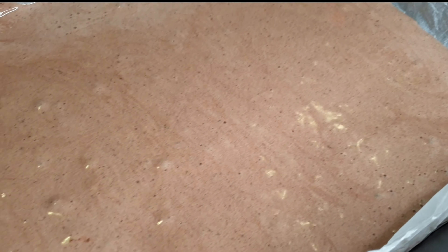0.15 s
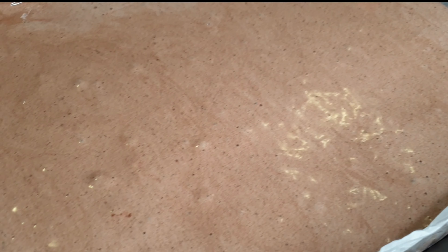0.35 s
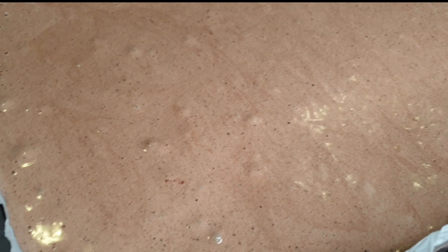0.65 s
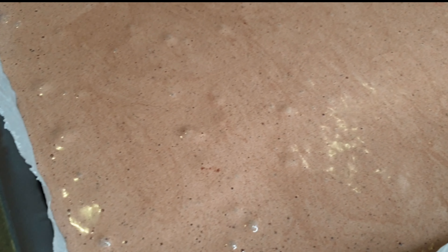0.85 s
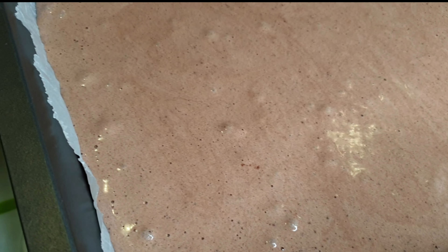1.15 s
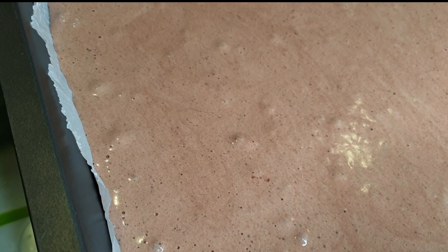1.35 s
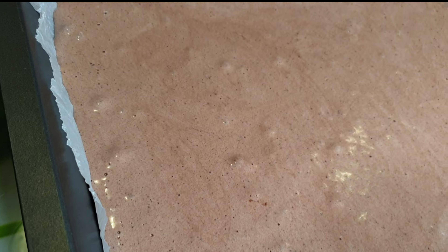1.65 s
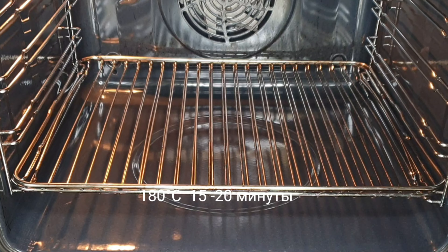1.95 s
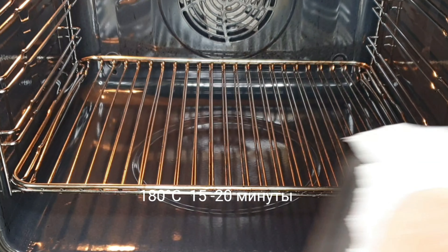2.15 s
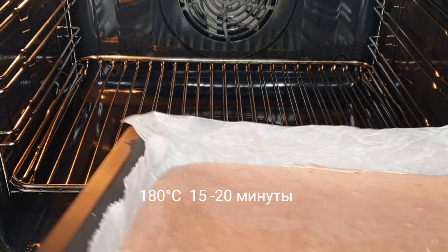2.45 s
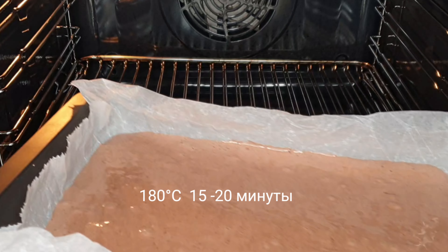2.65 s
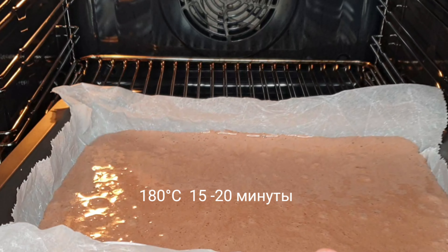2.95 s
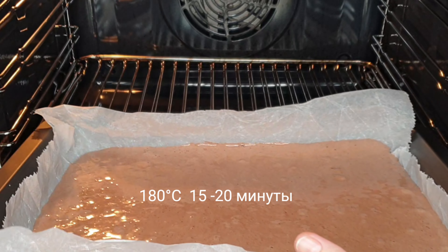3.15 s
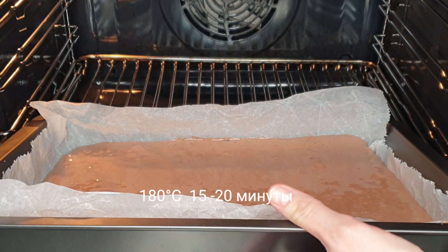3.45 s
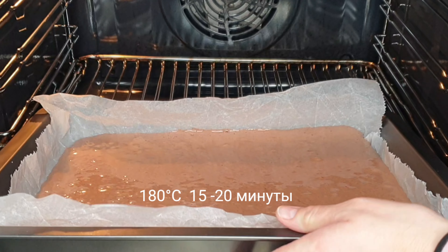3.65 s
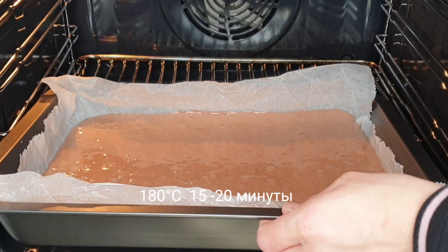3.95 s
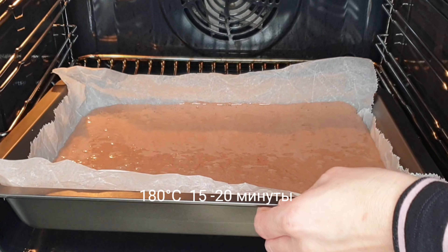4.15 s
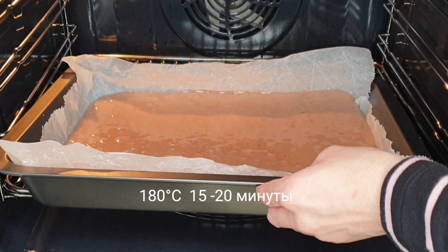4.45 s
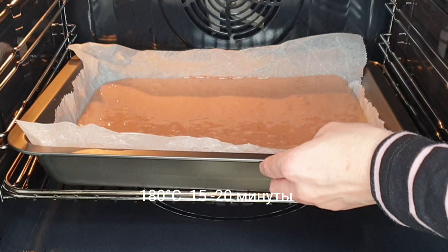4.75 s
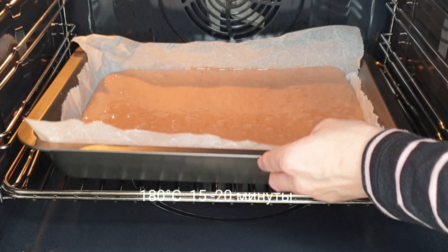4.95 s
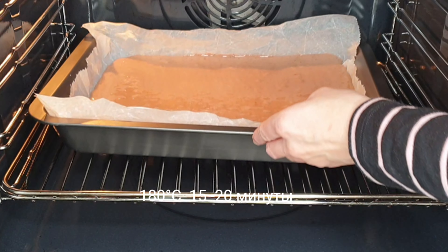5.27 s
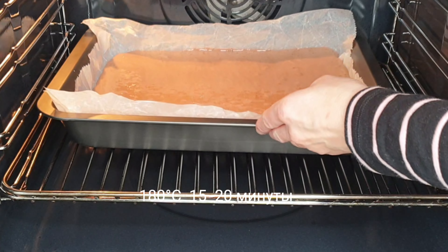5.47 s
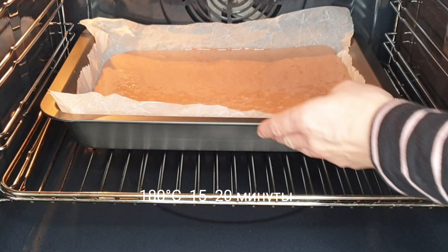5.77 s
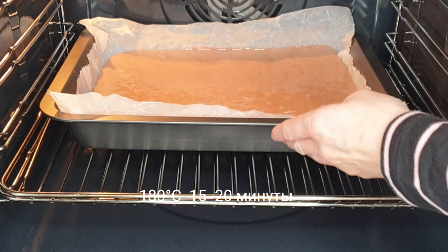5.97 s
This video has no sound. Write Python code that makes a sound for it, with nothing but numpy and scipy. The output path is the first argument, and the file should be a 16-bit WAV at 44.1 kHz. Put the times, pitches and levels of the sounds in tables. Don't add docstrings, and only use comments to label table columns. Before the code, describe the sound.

Quiet room tone, then soft oven hum, a crisp paper brush, one loud metallic clank, lighter knocks and uneven scraping as a tray slides in.

```python
import sys
import numpy as np
from scipy import signal
from scipy.fft import rfft, irfft
from scipy.io import wavfile
from scipy.ndimage import uniform_filter1d

SR = 44100
rng = np.random.default_rng(int(sys.argv[2]) if len(sys.argv) > 2 else 0)


def bounce(signal):
    frames = np.transpose(np.atleast_2d(signal))
    limited = np.clip(frames, -1, 1)
    pcm = np.round(limited * 32767).astype(np.int16)
    wavfile.write(sys.argv[1], SR, pcm)


def convert_level_to_amplitude(level_db):
    exponent = np.asarray(level_db, float) / 20
    return 10 ** exponent


N = 269451


def evened(x):
    return x / np.sqrt(np.mean(x ** 2) + 1e-24)


def read(points, hz):
    point_hz, value = np.transpose(points)
    return np.interp(np.log(hz + 1), np.log(point_hz + 1), value)


def columns(rows):
    start_s, *rest = np.transpose(rows)
    t = np.arange(N) / SR
    gate = np.clip(np.minimum(t - start_s[0], start_s[-1] - t) / 0.0024, 0, 1)
    return gate, *(np.interp(t, start_s, column) for column in rest)


# pitch_hz [Hz], left_over_right_db [dB]
MIC_LEAN = [(60, -1), (130, -1.5), (290, -2.0), (640, -3.0), (1410, -5), (3100, -5), (6820, -5.5),
            (15000, 1.5)]


def pair(tone, same, size, grit=1., lean=MIC_LEAN):
    hz = np.fft.rfftfreq(size, 1 / SR)
    a, b = rfft(rng.standard_normal((2, size)) * grit)
    likeness = np.clip(read(same, hz), -1, 1)
    half_db = read(lean, hz) / 2
    left = a * convert_level_to_amplitude(half_db)
    right = (likeness * a + np.sqrt(1 - likeness ** 2) * b) * convert_level_to_amplitude(-half_db)
    return irfft(np.array([left, right]) * convert_level_to_amplitude(read(tone, hz)), size)


def split(x, edges_hz, order=2):
    size = x.shape[-1]
    hz, z = np.fft.rfftfreq(size, 1 / SR), rfft(x)
    below = [0 * hz] + [1 / (1 + (hz / edge) ** (2 * order)) for edge in edges_hz] + [0 * hz + 1]
    return [irfft(z * (upper - lower), size) for lower, upper in zip(below, below[1:])]


def resonate(x, hz, width_hz):
    radius = np.exp(-np.pi * width_hz / SR)
    pole = radius * np.exp(2j * np.pi * hz / SR)
    out = 2 * signal.lfilter([1 - radius], [1, -pole], x)
    return out if np.iscomplexobj(x) else out.real


def slow(rate_hz):
    points = int(N * rate_hz // SR + 2)
    chance = rng.standard_normal(points)
    return evened(np.interp(np.arange(N) * rate_hz / SR, np.arange(points), chance))


def tones(lines, waver_db, waver_hz, apart_rad):
    out = np.zeros((len(lines), 2, N))
    for k, (hz, db) in enumerate(lines):
        phase = 2 * np.pi * (np.cumsum(hz + waver_hz * slow(9)) / SR + rng.random())
        level = np.sqrt(2) * convert_level_to_amplitude(db + waver_db * slow(11))
        out[k] = level * np.sin(phase - np.array([[0], [apart_rad]]))
    return out


# start_s [s], rumble_db [dB], hiss_db [dB], lower_whine_db [dB], upper_whine_db [dB]
KITCHEN_LEVELS = [(0.0, -65.5, -78.5, -88, -79.5), (0.326, -68, -78, -78, -78.5),
                  (0.35, -70.5, -77, -78, -82), (0.642, -62, -80, -77, -88), (0.756, -64.5, -79, -89, -96),
                  (0.84, -64, -73.5, -72.5, -87), (0.908, -64, -74.5, -86, -88),
                  (0.942, -69, -77.5, -78, -96), (0.992, -64.5, -79, -89, -96),
                  (1.126, -65, -79.5, -86.5, -99), (1.23, -69.5, -78.5, -86, -97),
                  (1.328, -64, -80.5, -91, -98), (1.59, -68, -78.5, -83, -99), (1.64, -64, -78, -83, -96),
                  (1.734, -68.5, -85, -85, -101), (1.775, -80, -108, -94, -119)]
# pitch_hz [Hz], level_db [dB per Hz]
KITCHEN_AIR = [(18, -19), (30, -20), (55, -9.5), (97, -6.5), (130, -5), (256, -11.5), (369, -12),
               (970, -36.5), (1910, -36), (2240, -31), (3070, -40), (8060, -47), (15500, -36)]
# pitch_hz [Hz], width_hz [Hz], level_db [dB]
ROOM_MODES = [(62.3, 15, -3.5), (128.6, 11, 1), (228, 15, -11.5), (286, 16, -8.5), (373, 10, -10.5),
              (478, 35, -17)]
# pitch_hz [Hz], level_db [dB]
KITCHEN_WHINE = [(2218, -82), (2266, -76.5), (2412, -85), (2460, -95.5)]
# pitch_hz [Hz], left_right_likeness [-1 to 1]
KITCHEN_SAME = [(60, 0.64), (180, 0.74), (550, 0.39), (1650, -0.23), (4970, 0.17), (15000, -0.01)]


def kitchen():
    gate, rumble_db, hiss_db, lower_db, upper_db = columns(KITCHEN_LEVELS)
    air = pair(KITCHEN_AIR, KITCHEN_SAME, N, lean=[(60, -5), (9000, 1.5)])
    low, mid, high = split(air, [900, 3000])
    white = pair([(30, 0), (9000, 0)], KITCHEN_SAME, N)
    standing = sum(convert_level_to_amplitude(db + 4.1 * slow(8.1)) * evened(resonate(white, hz, width_hz))
                   for hz, width_hz, db in ROOM_MODES)
    rumble = evened(evened(low) + 0.64 * evened(standing))
    lines = tones(KITCHEN_WHINE, waver_db=1.2, waver_hz=0.6, apart_rad=1.2)
    whine = evened(lines[:2].sum(0)) * convert_level_to_amplitude(lower_db) + evened(lines[2:].sum(0)) * convert_level_to_amplitude(upper_db)
    hiss = evened(high) * convert_level_to_amplitude(hiss_db) + evened(mid) * convert_level_to_amplitude(hiss_db - 4)
    return gate * (rumble * convert_level_to_amplitude(rumble_db) + hiss + whine)


# pitch_hz [Hz], level_db [dB per Hz]
OVEN_AIR = [(18, -41), (30, -14.5), (114, -5), (455, -19.5), (518, -19), (639, -26.5), (830, -24.5),
            (970, -46.5), (1140, -35), (1770, -46), (2490, -44.5), (4420, -50.5), (15500, -47.5)]
# pitch_hz [Hz], level_db [dB]
OVEN_HUM = [(100.5, -72.5), (200.5, -79.5)]
# pitch_hz [Hz], left_right_likeness [-1 to 1]
OVEN_SAME = [(60, 0.94), (180, 0.96), (550, 0.63), (1650, 0.13), (4970, -0.05), (15000, 0.01)]


def oven(whine_db, air_db):
    air = evened(pair(OVEN_AIR, OVEN_SAME, N))
    upper_whine = resonate(air, 2420, 30)
    lower_whine = resonate(resonate(air, 2260, 90), 2260, 90)
    whine = evened(lower_whine + 0.616 * upper_whine)
    fan = convert_level_to_amplitude(-64 - 6 + air_db + 1.7 * slow(4.1)) * air
    hum = tones(OVEN_HUM, waver_db=2.5, waver_hz=2.5, apart_rad=0.1).sum(0)
    return fan + convert_level_to_amplitude(whine_db) * whine + hum


def ringing(modes, t, ring, build_cycles):
    hz, db, t60 = np.transpose(modes)[:, :, None, None]
    luck = rng.random((len(modes), 3, 1))
    phase = 2 * np.pi * (luck[:, :1] + np.clip(hz / 1800, 0, 1) * luck[:, 1:])
    envelope = convert_level_to_amplitude(db - 60 * t / (ring * t60)) * (1 - np.exp(-t * hz / build_cycles))
    return evened((envelope * np.sin(2 * np.pi * hz * t + phase)).sum(0))


def peaked(x):
    return x / abs(x.mean(0)).max()


# pitch_hz [Hz], level_db [dB per Hz]
CLANG = [(29, -47.5), (50, -19), (89, 0), (283, -0.5), (387, -2.5), (481, -15), (543, -3.5), (798, -12),
         (1060, -9.5), (1260, -12.5), (1900, -15), (10000, -30), (15800, -37)]
# pitch_hz [Hz], left_right_likeness [-1 to 1]
BLOW_SAME = [(60, 0.97), (130, 0.98), (290, 0.72), (640, 0.69), (1410, 0.1), (3100, -0.02), (6820, -0.0),
             (15000, 0.02)]
# pitch_hz [Hz], t60_s [s]
TAIL = [(60, 0.53), (170, 0.54), (480, 0.44), (1400, 0.45), (2700, 0.49), (5400, .26), (11000, 0.3)]
# pitch_hz [Hz], level_db [dB], t60_s [s]
RACK_MODES = [(350, 1, 0.81), (516, -12, 1.74), (717, -2, 0.97), (1090, -10.5, 0.78), (1903, -16, 0.49),
              (2430, -35, 4.6)]


def knock(modes, thud_db, tick_db, lean_db, ring):
    t = np.arange(24576) / SR
    edges = np.geomspace(110, 9000, num=8)
    mids = np.r_[70, np.sqrt(edges[1:] * edges[:-1]), 12000]
    clang = pair(CLANG, BLOW_SAME, len(t), lean=[(60, 0.0014), (9000, 0)])
    dense = 0
    for band, hz in zip(split(clang, edges), mids):
        rise = 1 - np.exp(-t / (0.0002 + 1.1 / hz))
        late = convert_level_to_amplitude(-60 * t / (ring * read(TAIL, hz)))
        early = 2.5 * np.exp(-t / 0.0045)
        dense = dense + band * rise * (late + early)
    swing = (1 - t[:200] / 0.00016) * np.exp(-t[:200] / 0.00016)
    echoes = np.zeros((2, len(t)))
    delay = np.c_[[4, 12], rng.integers(20, 200, (2, 5))]
    np.put_along_axis(echoes, delay, rng.choice([-1, 1], 6) * np.exp(-delay / 220), 1)
    crack = signal.fftconvolve(echoes, swing[None], axes=1)[:, :len(t)]
    tray = ringing(modes, t, ring, build_cycles=2.3)
    wires = ringing(RACK_MODES, t, ring, build_cycles=60)
    struck = evened(dense) + 0.7 * tray + 0.03 * wires + 14 * crack
    low, mid, high = split(struck, [500, 4000])
    both = peaked(mid) + convert_level_to_amplitude(thud_db) * peaked(low) + convert_level_to_amplitude(tick_db) * peaked(high)
    side = convert_level_to_amplitude([[lean_db / 2], [-lean_db / 2]])
    return both * side * np.clip(t / 0.0002, 0, 1) * np.clip((t[-1] - t) * 10, 0, 1)


# start_s [s], peak_db [dB], thud_db [dB
# relative], tick_db [dB relative], left_lean_db [dB], ring [share of a full blow]
KNOCKS = [(2.054, -66.5, -15, 3, -6.5, 0.57), (2.444, -57, -27, 4.5, -6, 0.87),
          (2.478, -59.5, 0, 4, -4.5, 0.7), (2.522, -18.5, -14.5, -2.5, -2, 0.83),
          (3.199, -46.5, -12, -11.5, -2.5, 0.5), (3.212, -44, -7, -19.5, -4.5, 0.76),
          (3.349, -47, -18, -1, -5, 0.36), (3.382, -44.5, -5, -15.5, -4, 0.41),
          (3.407, -40.5, -7, -1, -2.5, 0.58), (3.449, -46, -14, -0.5, -8.5, 0.54),
          (3.496, -48.5, -12, 1.5, -5, 0.73), (3.68, -62, -13, -3.5, -5.5, 0.65),
          (3.701, -57, -4, -23.5, -4.0, 0.9), (5.003, -59.5, -15, -3, -3, 0.57),
          (5.533, -37.5, -12.5, -14.5, -5, 0.59), (5.569, -47, -2, -19.5, -1, 0.74),
          (2.505, -50, -17, 7.5, -5, .4),
    (2.543, -27.5, -1, -6, -2, 0.84),
    (3.531, -56.5, -5, -2, -3, 0.68),
]
# pitch_hz [Hz], level_db [dB], t60_s [s]
TRAY_FRONT = [(81.4, -10.5, 0.88), (230.8, -8, 0.47), (359.3, 0.5, 0.34), (394.4, -4.5, 0.33),
              (437.3, -10, 0.6), (537.5, -3.5, 0.32), (628, -4, 0.26), (889, -10.5, 0.21), (1054, -10, 0.3),
              (1090, -16.5, 0.34), (1390, -18, 0.29), (1503, -8.5, 0.17), (1723, -12.5, 0.36),
              (1826, -11, 0.16), (1880, -10, 0.27), (2200, -14.5, 0.37), (2385, -20.5, 0.44),
              (2773, -10.5, 0.17), (2955, -21, 0.31), (3066, -26.5, 0.19), (3330, -30, 0.26),
              (3470, -19.5, 0.15), (3871, -21, 0.29), (4170, -23.5, 0.34), (4240, -28.5, 0.26),
              (4830, -27.5, 0.3)]
# pitch_hz [Hz], level_db [dB], t60_s [s]
TRAY_IN = [(200, -6, 0.44), (421.6, -1, 0.96), (633, -12.5, 0.21), (920, -6, 0.77), (983, -22, 0.89),
           (1060, -4, 0.35), (1217, -24.5, 0.92), (1440, -20, 0.42), (2019, -22, 0.74), (2600, -10.5, 0.35),
           (3630, -40, 0.28), (4140, -27, 0.32), (4700, -28, 0.94), (4860, -44, 0.37)]


def knocks():
    out = np.zeros((2, N + SR))
    for start_s, peak_db, *colour in KNOCKS:
        modes = TRAY_FRONT if start_s < 3.6 else TRAY_IN
        sound = convert_level_to_amplitude(peak_db) * knock(modes, *colour)
        out[:, round(start_s * SR):][:, :sound.shape[1]] += sound
    return out[:, :N]


def grit(per_s, spread_db):
    sizes = convert_level_to_amplitude(spread_db * np.minimum(rng.exponential(1, N), 4))
    slips = sizes * (rng.random(N) < per_s / SR)
    return 0.76 + signal.lfilter([1], [1, -0.96], slips)


# start_s [s], level_db [dB], body_db [dB relative], left_lean_db [dB]
PAPER_BRUSHES = [
    [(2.062, -82, -3, -7), (2.086, -77, -13, -3), (2.128, -77, -24, 2), (2.14, -82, -8, -1.5),
     (2.162, -86, -16, 0), (2.22, -95, 1, 4)],
    [(2.258, -71, -23, -13), (2.276, -47, -18, -5.5), (2.332, -54, -7.5, -7), (2.344, -44, -13.5, -9.5),
     (2.385, -70.5, 5, -1)],
]
PAPER_REST = [
    (2.38, -62.5, -4, -3),
    (2.435, -75, -3, -4),
    (2.46, -67.5, -3, -3.5),
    (2.5, -70, -2, -3.5),
    (2.52, -70, -2, -3.5),
]
# pitch_hz [Hz], level_db [dB per Hz]
PAPER_TONE = [(240, -48), (400, -21.5), (752, -18.5), (1050, -13.5), (1860, -14.5), (2070, -9), (3340, -12),
              (4480, -4.5), (8670, -11), (14400, -8.5), (15800, -18.5)]
# pitch_hz [Hz], left_over_right_db [dB]
PAPER_LEAN = [(60, 0.5), (130, -3), (290, -7.0), (640, -5.5), (1410, -3.5), (3100, -11.5), (6820, -6.5),
              (15000, -1.5)]


def paper():
    rub = pair(PAPER_TONE, OVEN_SAME, N, grit(5500, 1.5), lean=PAPER_LEAN)
    body, crisp = split(rub, [3000])
    out = np.zeros((2, N))
    for rows in PAPER_BRUSHES + [PAPER_REST]:
        gate, db, body_db, lean_db = columns(rows)
        side = convert_level_to_amplitude(np.array([lean_db + 9.5, -lean_db - 3.5]) / 2)
        out += gate * side * convert_level_to_amplitude(db) * (evened(crisp) + convert_level_to_amplitude(body_db) * evened(body))
    return out


# start_s [s], level_db [dB]
SHELL_SHAKES = [
    [(2.5, -69), (2.546, -48), (2.564, -46), (2.584, -57), (2.688, -66), (2.714, -66), (2.818, -66.5),
     (2.846, -72.5), (2.95, -68.5)],
    [(3.19, -71), (3.238, -54), (3.252, -51), (3.318, -57.5), (3.398, -66), (3.422, -56), (3.518, -61),
     (3.548, -68), (3.616, -62), (3.662, -69), (3.694, -61), (3.738, -76), (4.0, -69)],
    [(5.5, -71), (5.562, -68), (5.586, -61), (5.706, -68), (5.744, -64), (5.886, -72.5), (5.902, -82.5),
     (5.972, -73.5), (6.004, -79.5), (6.036, -69.5), (6.1, -67.5)],
]
# pitch_hz [Hz], width_hz [Hz], level_db [dB]
SHELL_MODES = [(44.8, 82, -8.5), (67, 36, -5.5), (102.6, 20, -0.5)]


def shell():
    white = pair([(30, 0), (9000, 0)], OVEN_SAME, N)
    boom = evened(sum(convert_level_to_amplitude(db) * evened(resonate(resonate(white, hz, width_hz), hz, width_hz))
                      for hz, width_hz, db in SHELL_MODES))
    return boom * sum(gate * convert_level_to_amplitude(db) for gate, db in map(columns, SHELL_SHAKES))


def patchy(x, depth_db):
    _, _, z = signal.stft(x, nperseg=512)
    field = rng.standard_normal(z.shape[1:])
    field = uniform_filter1d(field, size=4, axis=0)
    field = evened(uniform_filter1d(field, size=14, axis=1))
    return signal.istft(z * convert_level_to_amplitude(depth_db * field), nperseg=512)[1][:, :N]


# start_s [s], drag_db [dB], hiss_db [dB relative], rumble_db [dB relative],
# singing_patch_hz [Hz]
SETTLE = [
    (3.2, -62, 1, 10.5, 1110),
    (3.3, -69, -6, 6.5, 1104),
    (3.4, -67.5, 2, 10.5, 1100),
    (3.5, -64.5, 0.5, 3, 1090),
]
SLIDE = [(3.55, -65.5, -6, 1, 1080), (3.654, -72.5, 0.5, 1, 1150), (3.714, -63.5, -7.5, 4.5, 1000),
         (3.73, -67.5, -2.5, -0.5, 978), (3.84, -67.5, 2.5, 0, 1120), (3.912, -66, 3.5, 0, 1048),
         (3.96, -61, -1.5, -6.5, 1332), (4.032, -63, -4, -10, 1235), (4.082, -63.5, 0.5, -4, 1213),
         (4.274, -79, 2.5, 8, 1172), (4.312, -70.5, -6, -6, 940), (4.34, -71.5, -2, 0.5, 1070),
         (4.406, -64, -2, -11, 1540), (4.454, -69, 2, 0, 1148), (4.492, -67.5, 1.5, 1.5, 1053),
         (4.662, -62.5, -4.5, -16, 1586), (4.728, -65, 1, -9, 1310), (4.898, -60, -9, -6, 979),
         (4.97, -71, -6, 0.5, 1040), (5.014, -63.5, 0.5, -6.5, 1060), (5.036, -70, 0.5, 2, 1080),
         (5.074, -70, -2, -4, 1220), (5.152, -69.5, 0, -6, 1350), (5.244, -67.5, -3, -2, 890),
         (5.304, -69.5, -2.5, -2.5, 1068), (5.492, -70.5, -2, 1.5, 1210.5), (5.52, -72.5, 1, 2, 1270)]
STOP = [
    (5.6, -65, -3.5, 2.2, 920),
    (5.68, -65.5, -13, 5.1, 920),
    (5.73, -74, -5, 7.5, 920),
    (5.77, -75.5, -7.5, 6.4, 926),
    (5.8, -80.5, -18, 9.9, 930),
    (5.88, -86.5, -20, 12, 920),
    (6.0, -92.5, -19.5, 7.4, 940),
]
# pitch_hz [Hz], level_db [dB per Hz]
SLIDE_TONE = [(88, -22), (150, -6), (235, -2.5), (315, -18.5), (421, 0.5), (502, -8), (741, -6), (919, -12),
              (1010, -2.5), (2840, -11), (3660, -17.5), (7830, -24.5), (10300, -21), (14600, -28),
              (15800, -44.5)]
# pitch_hz [Hz], width_hz [Hz], level_db [dB]
SLIDE_RING = [(430, 25, -7), (889, 48, 5), (1224, 29, -8)]


def slide():
    gate, drag_db, hiss_db, rumble_db, patch_hz = columns(SETTLE + SLIDE + STOP)
    rub = patchy(pair(SLIDE_TONE, OVEN_SAME, N, grit(4000, 0.67)), depth_db=2.1)
    sing = sum(convert_level_to_amplitude(db) * evened(resonate(rub, hz, 0.3 * width_hz)) * convert_level_to_amplitude(1.9 * slow(13))
               for hz, width_hz, db in SLIDE_RING)
    turn = np.exp(2j * np.pi * np.cumsum(patch_hz) / SR)
    wander = (turn * resonate(rub / turn, 0, 120)).real
    scrape = evened(rub) + 0.25 * evened(sing) + 0.21 * evened(wander)
    low, mid, high = split(scrape, [600, 3500])
    return gate * convert_level_to_amplitude(drag_db) * (evened(mid) + convert_level_to_amplitude(hiss_db) * evened(high) + convert_level_to_amplitude(rumble_db) * evened(low))


# start_s [s], fade_db [dB], whine_db [dB], fan_air_db [dB]
OVEN_FADE = [(1.787, -34, -78, 3), (1.82, -22, -82, 2), (1.9, -9, -85, 1), (1.97, 2, -87, 0.5),
             (2.05, 0, -90, -0.5), (2.3, 0.5, -95, -1), (2.85, -0.5, -103, -1.5), (3.15, -2, -103, -1),
             (3.6, 0, -103, 0), (5.8, 0, -101, 1.5), (6.2, 3, -100, 0)]


def scene():
    gate, fade_db, whine_db, air_db = columns(OVEN_FADE)
    at_oven = oven(whine_db, air_db) + knocks() + paper() + shell() + slide()
    return kitchen() + gate * convert_level_to_amplitude(fade_db) * at_oven


def low_pass(x):
    return signal.sosfilt(signal.butter(12, 16530, fs=SR, output="sos"), x)


def record(dry):
    roll_off = signal.butter(2, 40, "high", fs=SR, output="sos")
    thin = signal.sosfilt(roll_off, dry)
    limit = signal.firwin(201, 15700, window=("kaiser", 3), fs=SR)
    mix = signal.oaconvolve(thin, limit[None], "same")
    return low_pass(mix)


dry = scene()
out = record(dry)
bounce(out)
```